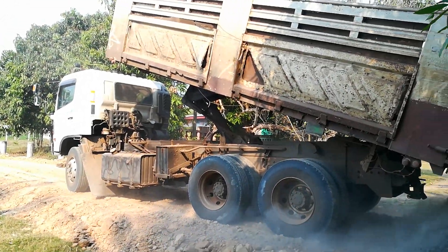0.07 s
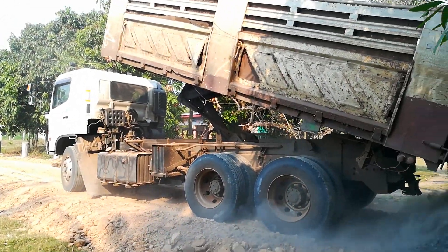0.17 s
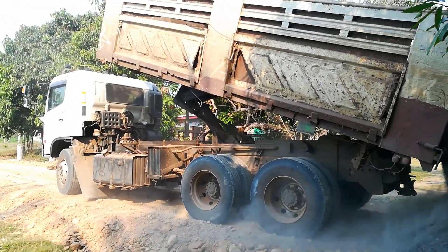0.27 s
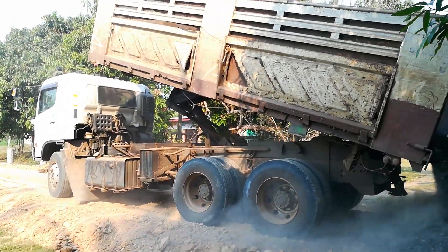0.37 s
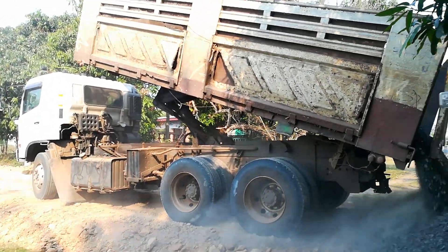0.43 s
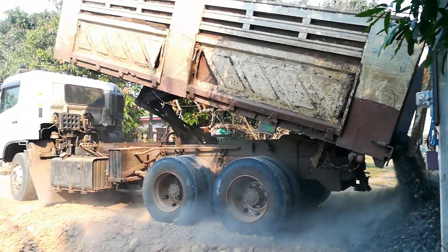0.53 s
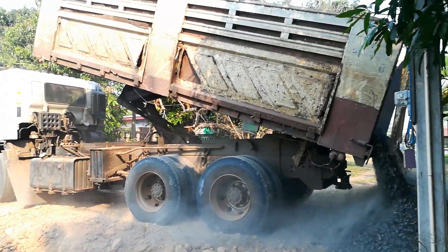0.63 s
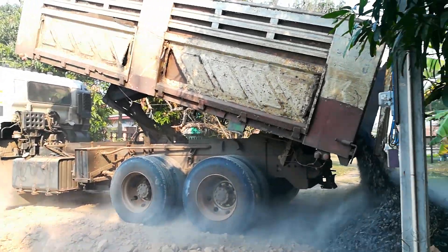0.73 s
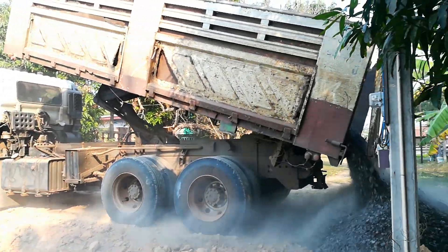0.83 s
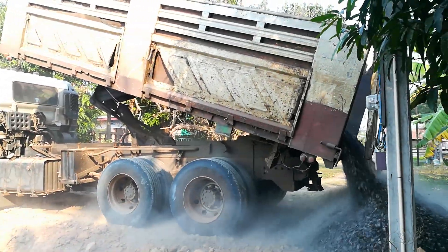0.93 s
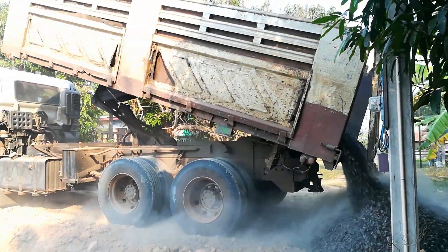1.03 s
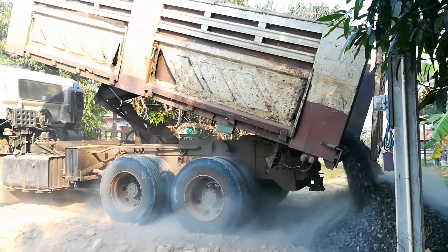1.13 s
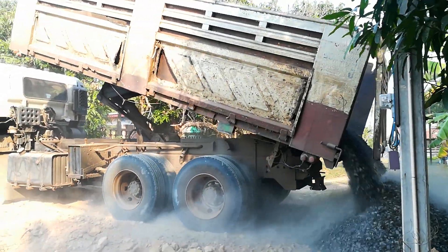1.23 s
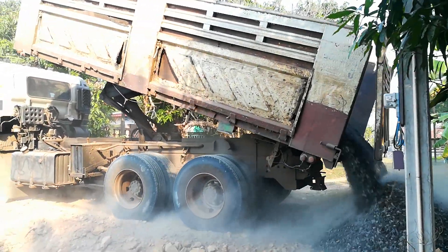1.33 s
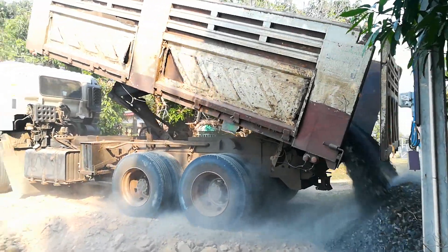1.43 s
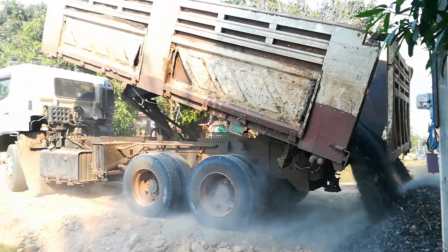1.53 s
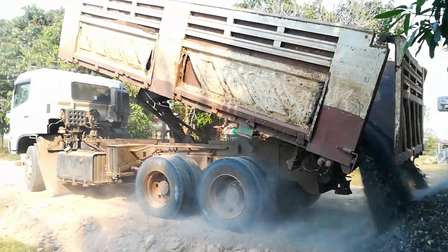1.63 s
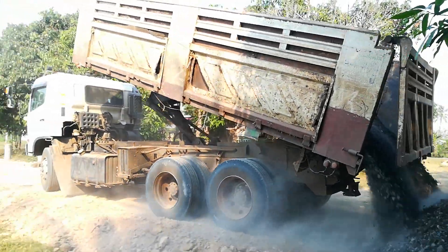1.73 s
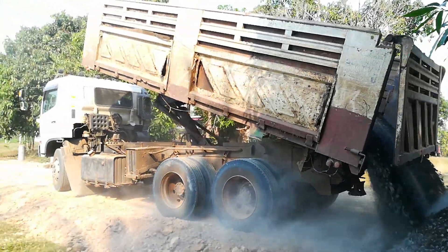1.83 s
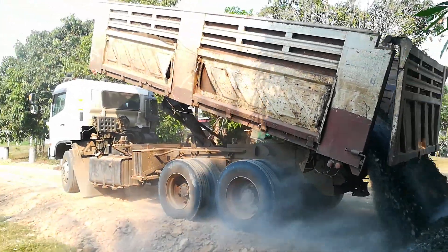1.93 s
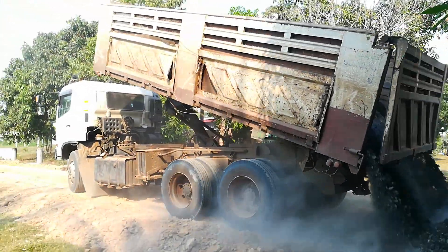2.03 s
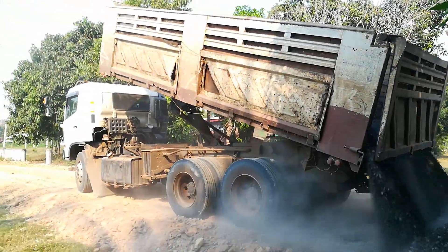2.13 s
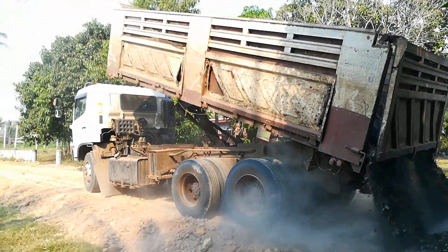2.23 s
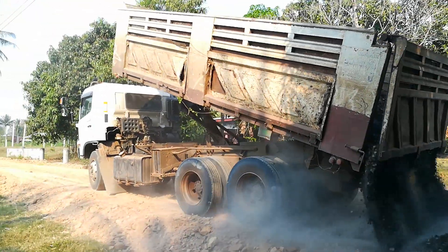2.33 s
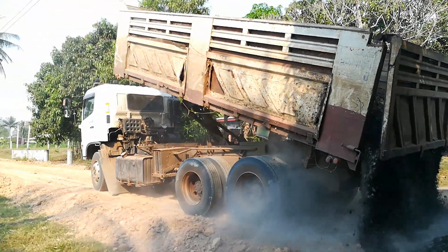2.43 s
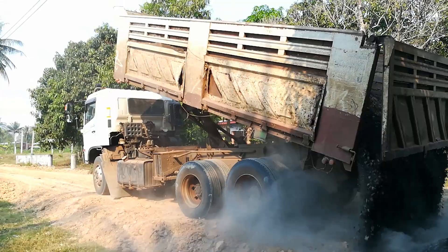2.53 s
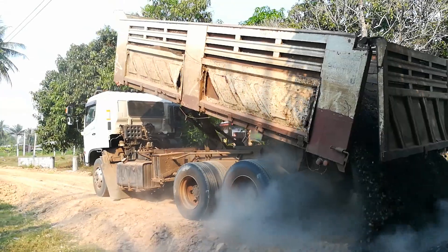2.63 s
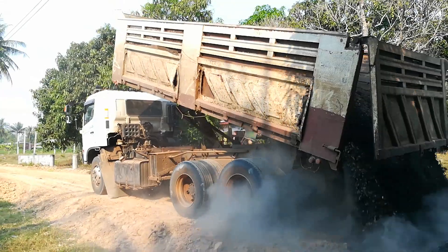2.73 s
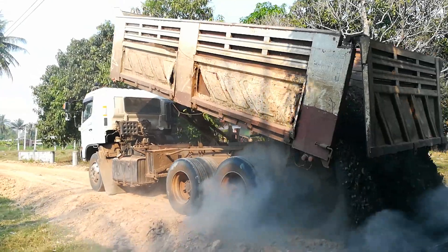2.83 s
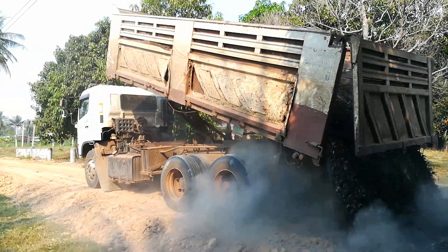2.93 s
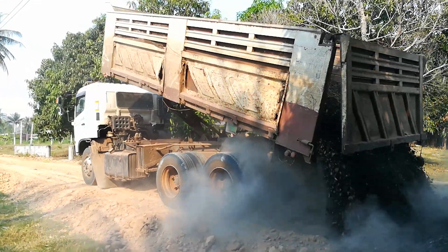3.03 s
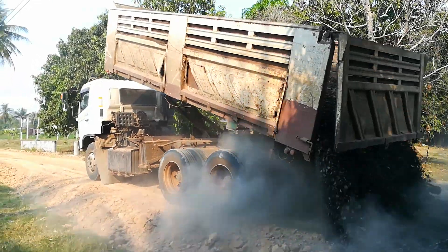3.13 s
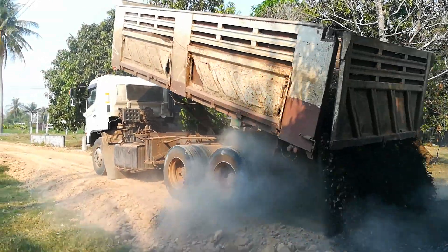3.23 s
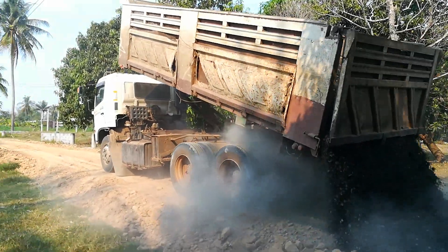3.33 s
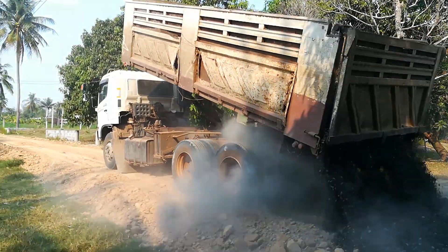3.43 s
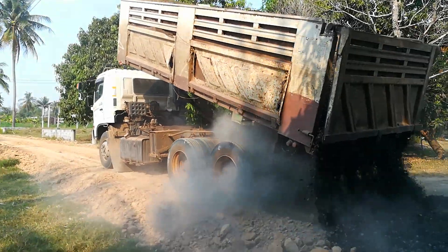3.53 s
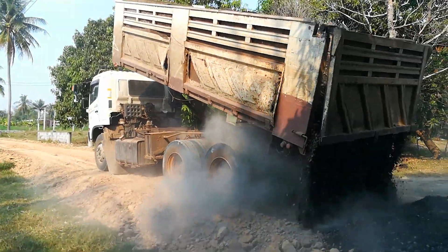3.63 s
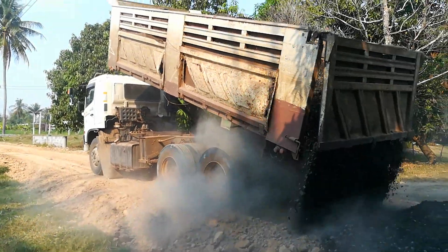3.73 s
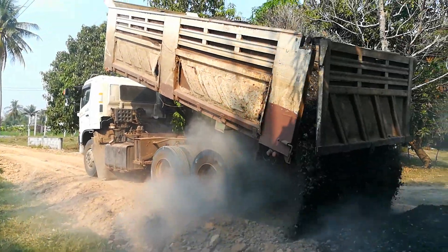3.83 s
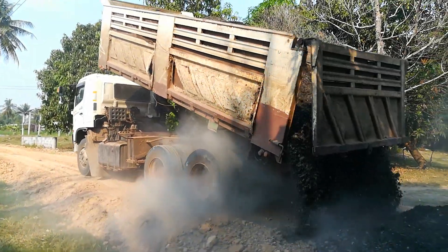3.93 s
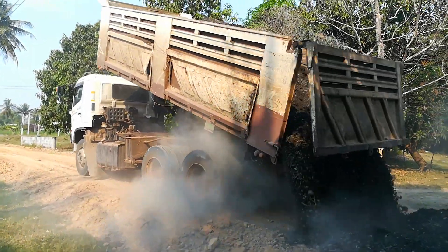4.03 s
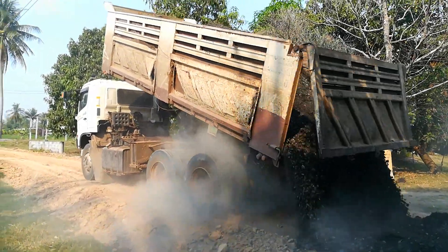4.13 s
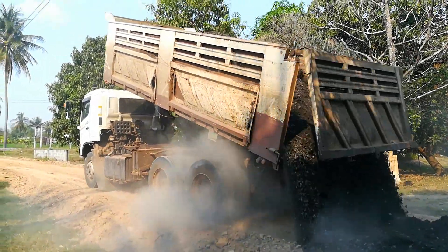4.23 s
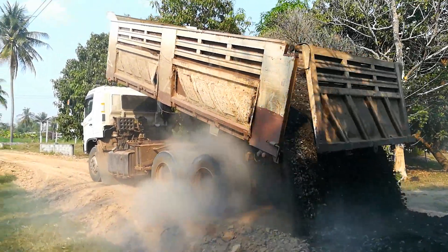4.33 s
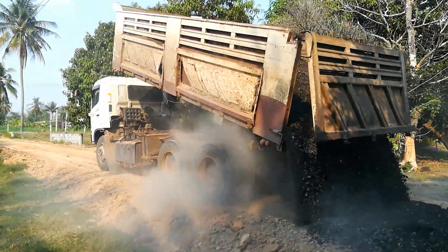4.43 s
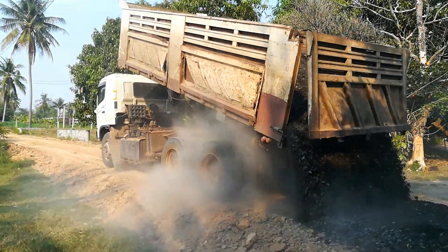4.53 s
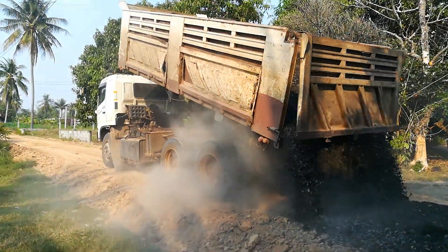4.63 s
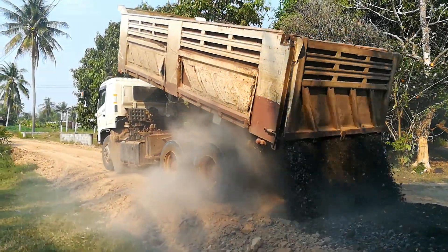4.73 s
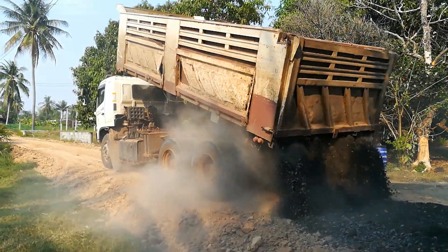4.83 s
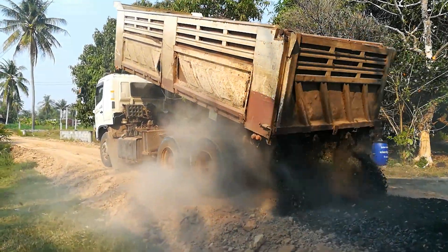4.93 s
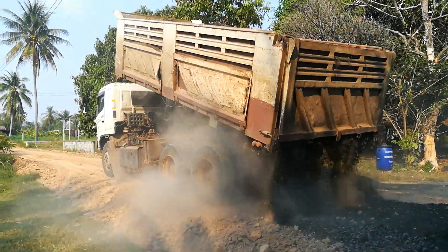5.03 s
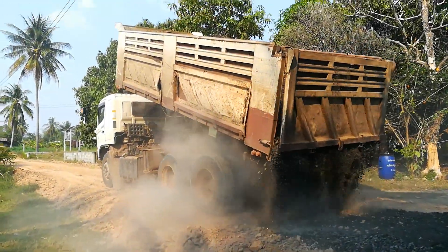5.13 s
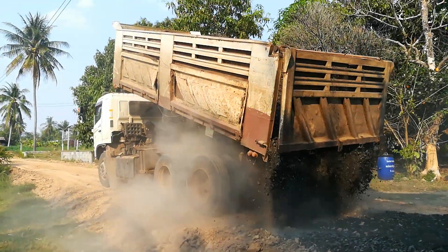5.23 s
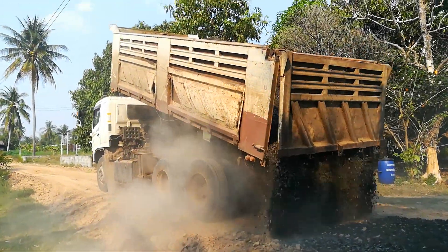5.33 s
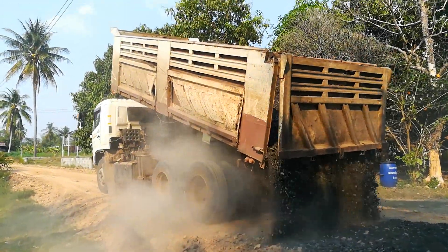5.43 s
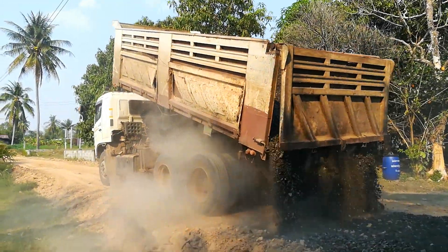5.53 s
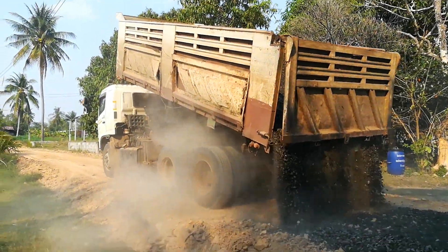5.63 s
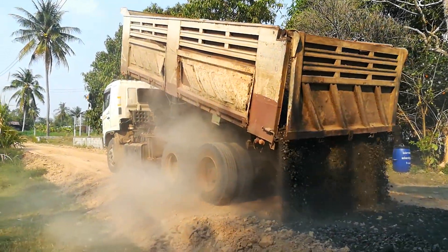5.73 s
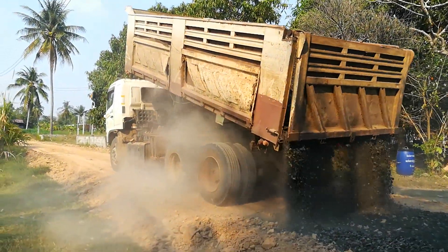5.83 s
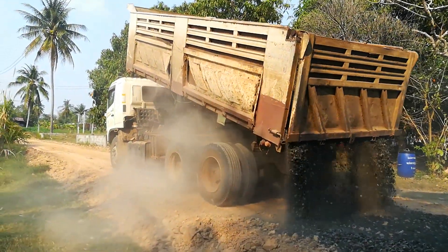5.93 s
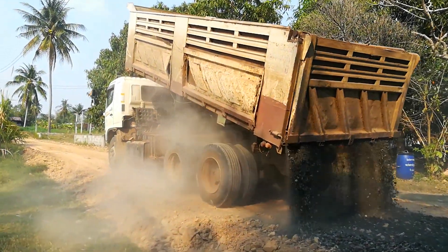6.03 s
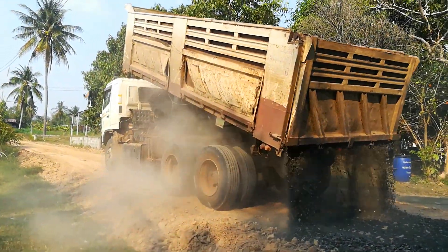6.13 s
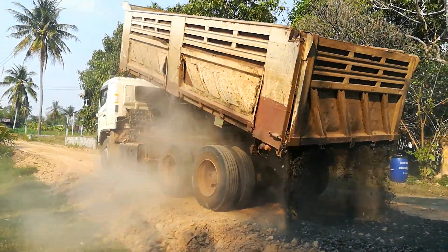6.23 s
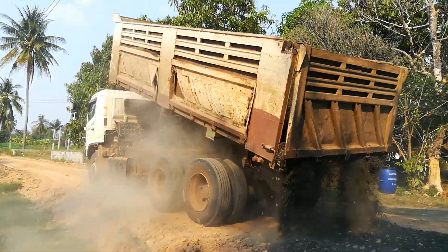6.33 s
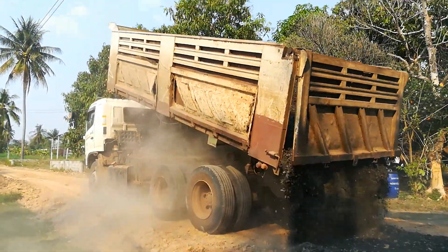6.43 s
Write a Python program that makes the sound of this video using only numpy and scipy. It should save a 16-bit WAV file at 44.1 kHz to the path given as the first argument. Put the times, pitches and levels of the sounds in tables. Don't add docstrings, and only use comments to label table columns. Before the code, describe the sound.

Outdoors on a dirt road, close to a tipped dump truck, gravel streams off the tail with a steady hiss and dull roar. Surges of stones clatter down the steel bed around two, three and just before five seconds, the biggest with a tailgate slam. Single stones clink and ping; the diesel rumbles low and uneven. A stereo camera microphone hears the rock slightly to the right.

```python
import sys
import numpy as np
from scipy import signal
from scipy.fft import rfft, irfft, next_fast_len
from scipy.io import wavfile
from scipy.ndimage import uniform_filter1d, map_coordinates

SR = 44100
rng = np.random.default_rng(int(sys.argv[2]) if len(sys.argv) > 2 else 0)


def unload_wav(signal):
    wavfile.write(
        sys.argv[1],
        SR,
        np.round(np.clip(np.atleast_2d(signal).T, -1, 1) * 32767).astype(np.int16),
    )


def nominal_scale(level):
    x = np.asarray(level, float) / 20
    return 10 ** x


N = 286209
TOP_HZ = 15760


def unit(x):
    return x / np.sqrt(np.mean(x ** 2) + 1e-20)


def along(points, hz):
    f, *cols = np.transpose(points)
    return np.array([np.interp(np.log(hz + 1), np.log(f + 1), c) for c in cols])


def curves(rows):
    s, *cols = np.transpose(sorted(rows))
    return [np.interp(np.arange(N) / SR, s, c) for c in cols]


def wobble(rate_hz):
    knots = rng.standard_normal(int(N * rate_hz / SR) + 4)
    return map_coordinates(knots, [np.arange(N) * rate_hz / SR])


def place(out, at_s, sound):
    start = round(at_s * SR)
    out[..., start:start + sound.shape[-1]] += sound


def filtered(x, response):
    m = next_fast_len(N + 8192)
    return irfft(rfft(x, m) * response(np.fft.rfftfreq(m, 1 / SR)), m)[..., :N]


def between(hz, lo_hz, hi_hz):
    return 1 / np.sqrt((1 + (lo_hz / (hz + 1)) ** 12) * (1 + (hz / hi_hz) ** 12))


def knocks(count, spread_db, decay_s):
    at, size = rng.random((count, 2)).T
    rare = np.minimum(-np.log(1 - size), 5)
    blows = np.bincount((at * N).astype(int), nominal_scale(spread_db * rare) ** 2, N)
    fade = np.exp(-1 / (decay_s * SR))
    return unit(np.sqrt(np.abs(signal.lfilter([1], [1, -fade], blows))))


# (time [s], lag [ms])
LEFT_LAG = [(0, 0.26), (2.9, 0.22), (3.3, 0.2), (4.7, 0.14), (6.49, 0.13)]


def ports(direct, scattered, alike, aside=1):
    hz, t, z = signal.stft(np.vstack([direct, scattered]), SR, nperseg=512)
    lag_s = aside * np.interp(t, *np.transpose(LEFT_LAG)) / 1000
    share, twist = along(alike, hz)[:, :, None]
    share = np.clip(share, 0, 1)
    late = np.exp(-1j * (2 * np.pi * hz[:, None] * lag_s + twist))
    shared = np.sqrt(share) * z[0] * [late, np.ones_like(late)]
    pair = shared + np.sqrt(1 - share) * z[1:]
    return signal.istft(pair, SR, nperseg=512)[1][:, :N]


def rock(tone, alike, impacts, lo_hz, hi_hz, patchy_db, aside=1):
    z = signal.stft(impacts * rng.standard_normal((3, N)), nperseg=256)[2]
    field = uniform_filter1d(rng.standard_normal(z.shape[1:]), 5, 0)
    field = uniform_filter1d(field, 4, 1)
    raw = signal.istft(z * nominal_scale(patchy_db * unit(field)), nperseg=256)[1][:, :N]
    pair = ports(raw[0], raw[1:], alike, aside)
    pair = filtered(pair, lambda hz: nominal_scale(along(tone, hz)) * between(hz, lo_hz, hi_hz))
    return pair / np.std(pair.mean(0))


# (peak time [s], stone level [dB], rise [s], fall [s], steel floor over stone [dB])
SLIDES = [(.31, -35.5, 0.24, 0.27, -7), (.46, -33.5, 0.24, 0.3, -8.5), (.6, -38.5, .1, 0.042, -8),
          (1.996, -37, .012, .12, -15), (2.04, -30.5, .05, .1, -12), (2.098, -26.5, 0.11, 0.12, -9.5),
          (2.25, -36.5, 0.28, 0.36, -5), (2.43, -44.5, .012, 0.1, 4.5), (3.24, -26.5, 0.065, 0.17, -4.5),
          (3.289, -27.5, .06, 0.15, -17), (3.46, -38.5, 0.099, 0.3, -4), (4.55, -43.5, 0.065, 0.15, -11),
          (4.702, -20, 0.072, 0.21, -3.5), (4.758, -22, .1, 0.064, -1.5), (4.9, -37, .1, 0.07, -16),
          (4.97, -35, .04, .22, -3.5), (5.17, -48, .02, 0.081, 2), (5.826, -36, 0.017, 0.24, -4),
          (5.89, -30.5, 0.046, 0.18, -5.5), (5.97, -28.5, 0.28, 0.5, -6.5), (6.17, -35, 0.24, 0.25, -5.5),
          (6.308, -43.5, .004, 0.082, 9), (6.369, -52, 0.031, 0.25, 8)]


def surges():
    t = np.arange(0, N, 32) / SR
    s, db, rise_s, fall_s, steel_db = np.transpose(SLIDES)[:, :, None]
    rising = np.abs((s - t) / rise_s) ** 1.38
    falling = np.abs((t - s) / fall_s) ** 0.96
    drop = np.where(t < s, rising, falling)
    stone = nominal_scale(2 * np.maximum(db - 20 * drop, -120))
    steel = stone * nominal_scale(2 * steel_db)
    return [np.interp(np.arange(N) / SR, t, p.sum(0)) for p in (stone, steel)]


def ring_on(power, time_s):
    fade = np.exp(-1 / (time_s * SR))
    return signal.lfilter([1 - fade], [1, -fade], power)


# (frequency [Hz], left level [dB], right level [dB])
SLIDE_TONE = [(117, -18, -9), (356, -4, -5), (464, -15, -12.5), (690, -19.5, -5), (870, -12.5, -6),
              (1090, -3, 2), (1790, 2.5, -6), (2440, -3, -11.5), (2480, -4, -4), (3300, -5, -0.5),
              (4670, -6, 0), (7030, -11.5, -3), (9930, -18.5, -9.5), (15000, -37, -33.5)]
# (frequency [Hz], likeness [0-1], left trails beyond path lag [rad])
SLIDE_ALIKE = [(130, .995, 0), (350, .93, .7), (1100, .92, -.4), (1900, .65, 0), (4000, .45, 0),
               (6500, .3, 0), (11000, .14, 0)]
# (frequency [Hz], width [Hz], level [dB])
FLOOR_MODES = [(870, 29, 10.5), (980, 19, 3.5), (1090, 41, 5.5), (1224, 11.7, 3), (1326, 10, 5),
               (1532, 42, 7.5), (1868, 38, 1.5)]
# (edge [Hz], edge [Hz], edge [Hz])
EDGES_HZ = (560, 2450, 8500)


def slides():
    low_hz, mid_hz, _ = EDGES_HZ
    stone_power, steel_power = surges()
    impacts = knocks(count=14000, spread_db=2.5, decay_s=.0022)

    def band(cushion, lo_hz, hi_hz, patchy_db):
        return rock(SLIDE_TONE, SLIDE_ALIKE, impacts + cushion, lo_hz, hi_hz, patchy_db)

    def floor(f):
        gain = 1
        for hz, width_hz, db in FLOOR_MODES:
            loss = 1j * f * width_hz
            gain = gain + (nominal_scale(db) - 1) * loss / (hz * hz - f * f + loss)
        return gain

    clatter = np.sqrt(stone_power) * band(0, mid_hz, 2 * TOP_HZ, 1.5)
    rattle = np.sqrt(ring_on(steel_power, 0.015)) * filtered(band(1.8, low_hz, mid_hz, 2.0), floor)
    shake = nominal_scale(-56.5) * (ring_on(steel_power, 0.061) * 10 ** 4) ** (1.49 / 2)
    boom = shake * band(2.37, 77, low_hz, 1.5)
    return clatter + nominal_scale(-1.5) * rattle + boom


# (time [s], flow [dB], dustiness [dB], heavy rock [dB])
FLOW = [(0, -43.5, 0, -4), (.35, -42.5, -4, -3), (.65, -44, -3, 0), (1.3, -45, -3, 3),
        (1.95, -42.5, -5, 2.1), (2.45, -44, -5, 2), (2.76, -40.5, -1, -3), (3.1, -43.5, -4.5, -2),
        (3.5, -54, -1, -0.5), (3.75, -45.5, -3.5, 4), (4.02, -41, -3, 1), (4.27, -45.5, -2.5, -2.6),
        (4.5, -42, 1, -0.5), (5.1, -46, -4, 5.5), (5.42, -38.5, 0, 1.5), (5.7, -40, -.6, 0.5),
        (6.2, -46.5, 1.5, -4), (6.49, -43, -4, -1.5)]
# (frequency [Hz], left level [dB], right level [dB])
STREAM_TONE = [(107, 0.5, 0), (367, -5.5, -5.5), (494, -12, -16), (640, -4.5, -19), (913, -3.5, -4),
               (1340, -10, -11.5), (1720, -4.5, -7), (2016, -14.5, -2), (2370, -12, -16), (3590, -11, -7.5),
               (4830, -9, -4.5), (7300, -9, -1.5), (11400, -11.5, -1), (16600, -17, -4)]
# (frequency [Hz], likeness [0-1], left trails beyond path lag [rad])
STREAM_ALIKE = [(103, 1, 0.44), (434, 0.96, -1.4), (1110, 0.66, 0.0083), (2110, 0.58, 1),
                (4130, 0.39, 0.28), (6600, 0.3, -0.4), (11000, 0, 0)]


def stream():
    low_hz, mid_hz, high_hz = EDGES_HZ
    flow_db, dust_db, heavy_db = curves(FLOW)
    roar_db = -51.5 + 0.77 * heavy_db + 0.22 * np.arange(N) / SR
    slide_dust = nominal_scale(-13) ** 2 * surges()[0]
    fines = np.sqrt(nominal_scale(flow_db + dust_db) ** 2 + slide_dust)
    impacts = knocks(count=16000, spread_db=2.5, decay_s=.0015)

    def fall(cushion, lo_hz, hi_hz, aside):
        return rock(STREAM_TONE, STREAM_ALIKE, impacts + cushion, lo_hz, hi_hz, 0.85, aside)

    surge_db = .5 * wobble(7)
    out = fines * nominal_scale(1.3 + 0.75 * wobble(6) + surge_db) * fall(0.9, high_hz, 2 * TOP_HZ, .5)
    out += nominal_scale(flow_db + surge_db) * fall(1.0, mid_hz, high_hz, 0.91)
    out += nominal_scale(roar_db + surge_db) * fall(4.7, low_hz, mid_hz, 0.085)
    return out + nominal_scale(-53 + heavy_db) * fall(3.8, 82, low_hz, 0.17)


# (time [s], peak [dB], ring [Hz], crack weight against the ring, higher is louder [dB])
CLINKS = [(0.144, -39, 6100, 10), (0.246, -23, 6440, -6), (0.362, -25, 3930, -2.5), (0.45, -24, 5370, -3),
          (1.699, -31, 5730, 8), (1.8163, -26, 5670, -1), (1.9942, -24, 5030, -6), (2.1048, -21.5, 3750, 6),
          (2.249, -24, 6700, -4), (2.3237, -20, 4880, -4), (2.358, -16.5, 7460, 0),
          (2.422, -10.5, 7450, -1), (2.5302, -35, 9900, -2.5), (3.1744, -22.5, 3580, -2),
          (3.2236, -36, 5220, -4), (4.337, -33, 6600, -12), (4.6742, -25, 3540, -4),
          (4.732, -10.5, 3760, 3), (5.1646, -23.5, 5550, 5), (5.6393, -27, 6980, -10),
          (5.771, -19.5, 5840, -1.5), (5.8193, -15, 3574, -2), (5.879, -19, 3640, 6),
          (5.9703, -18.5, 5140, 6.5), (6.1234, -19, 4300, -1), (6.1809, -16.5, 7610, 0.5),
          (6.2608, -30, 5400, 2), (6.3063, -23, 6400, -0.5)]


def clinks():
    ring, crack = np.zeros((2, 3, N + SR))
    t = np.arange(SR // 5) / SR
    ring_t60_s, scatter_t60_s = .06, .2
    for s, db, hz, crack_db in CLINKS:
        jitter, noise = rng.standard_normal((2, 3, len(t)))
        shape = (1 - np.exp(-t / 0.0011)) * nominal_scale(db - 60 * t / ring_t60_s)
        scatter = nominal_scale(db + 0.5 - 60 * t / scatter_t60_s)
        tone = np.sin(2 * np.pi * hz * t + np.cumsum(0.2 * jitter, axis=1))
        place(ring, s, nominal_scale(-5.5) * shape * tone)
        place(crack, s, nominal_scale(crack_db - 13.5) * (shape + scatter) * noise)
    both = ring[:, :N] + filtered(crack[:, :N], lambda hz: between(hz, 1070, 9900))

    def ears(hz):
        return nominal_scale(np.diff(along(SLIDE_TONE, hz), axis=0) * [[-.5], [.5]])

    return filtered(ports(both[0], both[1:], SLIDE_ALIKE), ears)


# (time [s], frequency [Hz], level [dB])
PINGS = [(0.153, 6120, -31), (0.283, 5530, -31), (0.361, 10508, -43), (1.25, 12200, -49),
         (1.564, 11630, -41), (1.873, 14220, -41), (2.24, 6420, -29.5), (2.715, 15503, -40),
         (3.073, 9010, -38), (3.388, 14740, -36), (3.808, 13380, -47), (3.826, 15220, -35),
         (3.88, 8740, -34), (4.356, 13300, -46), (4.376, 10410, -42), (4.379, 14540, -46),
         (4.515, 5050, -35.5), (4.895, 7700, -29), (5.077, 12500, -43), (5.16, 9302, -39),
         (5.172, 4220, -32), (5.792, 15400, -28), (5.819, 8050, -26), (6.234, 14950, -46),
         (6.382, 14400, -45.5)]


def pings():
    out, t = np.zeros(N + SR), np.arange(SR // 20) / SR
    for s, hz, db in PINGS:
        phase = 2 * np.pi * hz * t + np.cumsum(rng.normal(0, 0.38, len(t)))
        shape = nominal_scale(db + 4.5 - 60 * t / 0.14) * (1 - np.exp(-t / 0.0023))
        place(out, s, shape * np.sin(phase))
    return out[:N] * nominal_scale([[-9], [0]])


# (time [s], peak [dB])
THUDS = [
    (4.499, -34),
    (4.745, -17.5),
    (4.757, -19.5),
]
# (frequency [Hz], level [dB], t60 [s])
GATE_MODES = [(65.1, -8, 1.3), (106.8, -8, 1.2), (116.7, -9.5, 1.3), (229, 4.5, 0.16), (295, -11, 0.63),
              (336, -6.5, 0.35), (483, -8, .25), (763, -6, 0.39), (910, -15, 0.23), (1210, -21, .15)]


def tailgate():
    out, t = np.zeros((3, N + 2 * SR)), np.arange(SR) / SR
    for s, db in THUDS:
        for hz, mode_db, t60_s in GATE_MODES:
            rough = 0.046 * (hz / 1000) ** .35
            drift = np.cumsum(rng.normal(0, rough, (3, len(t))), axis=1)
            swing = (1 - np.exp(-t / 0.0042)) * np.sin(2 * np.pi * hz * t + drift)
            level_db = db + mode_db - 10.5 + rng.normal(0, 1)
            place(out, s, nominal_scale(level_db - 60 * t / t60_s) * swing)
    return ports(out[0, :N], out[1:, :N], SLIDE_ALIKE)


# (start [s], end [s], frequency [Hz], level [dB])
SQUEAKS = [
    (.7, 0.75, 8800, -53),
    (1.73, 1.818, 8710, -45),
    (1.82, 1.956, 8850, -49),
    (5.759, 5.805, 11200, -41),
    (6.138, 6.194, 10520, -41),
]


def hinge():
    out = np.zeros((2, N))
    for start, end, hz, db in SQUEAKS:
        t = np.arange(round((end - start) * SR)) / SR
        tone = np.sin(2 * np.pi * hz * t + np.cumsum(rng.normal(0, 0.07, len(t))))
        port_level = nominal_scale(db + np.array([[-4], [4]]))
        place(out, start, port_level * signal.windows.tukey(len(t), .4) * tone)
    return out


# (time [s], firing rate [Hz], load [dB], upper orders over the first [dB])
ENGINE = [(0, 25.6, -53, 2.5), (.3, 33.27, -46, 0.5), (.62, 36.7, -43.5, -2), (1.0, 34.05, -41.5, -5.5),
          (1.33, 30.8, -44.5, -0.5), (1.8, 35.96, -44, -4), (2.2, 41.95, -43.5, 1.5),
          (2.45, 38.65, -48.5, .1), (2.75, 30.17, -64, 9), (3.15, 26.56, -54, 0), (3.38, 39.5, -43, -1.5),
          (3.62, 46.8, -40, .1), (3.9, 42.97, -41, -0.2), (4.4, 34.34, -56.5, 10), (5.0, 42, -56.5, 20.5),
          (5.42, 26.1, -48.5, -5), (5.75, 23.07, -47.5, 0.5), (6.49, 24.9, -48, 4.5)]
# (multiple of the firing rate [1], level [dB])
ORDERS = [(1, -0.5), (2, -2.5), (2.5, -17), (3, -11), (4, -14.5), (5, -21)]
# (frequency [Hz], level [dB])
PIPE = [(23, -8), (33, -0.5), (47, 0.5), (56, -3), (68, -11), (90, -5.5), (130, -2.5), (200, -6)]
# (frequency [Hz], density [dB per Hz])
RUMBLE = [(12, -20), (22, 11), (38, 4), (54, 11), (92, 11.5), (179, -32), (260, -11), (340, -45),
          (570, -120)]


def engine():
    smooth = uniform_filter1d(curves(ENGINE), size=SR // 8)
    hz, load_db, harsh_db = uniform_filter1d(smooth, size=SR // 8)
    turn = 2 * np.pi * np.cumsum(hz * (1 + 0.004 * wobble(15))) / SR
    tones = np.zeros(N)
    for order, db in ORDERS:
        level_db = load_db + db + (order > 1) * harsh_db
        level_db = level_db + along(PIPE, order * hz)[0] + 0.65 * order * wobble(6.8)
        tones += nominal_scale(level_db) * np.sin(order * turn + order)
    mid, side = filtered(rng.standard_normal((2, N)), lambda f: nominal_scale(along(RUMBLE, f)[0]))
    rumble = unit(mid + 0.05 * side * [[1], [-1]])
    rumble_db = -58 + 0.095 * (load_db + 44) + 0.55 * wobble(2.88)
    return np.sqrt(2) * tones + nominal_scale(rumble_db) * rumble


def scene():
    return slides() + stream() + clinks() + pings() + tailgate() + hinge() + engine()


def top_cut(x):
    return signal.sosfilt(signal.butter(12, 17020, fs=SR, output="sos"), x)


def record(dry):
    mix = filtered(dry, lambda hz: hz < TOP_HZ)
    return top_cut(mix)


dry = scene()
out = record(dry)
unload_wav(out)
```